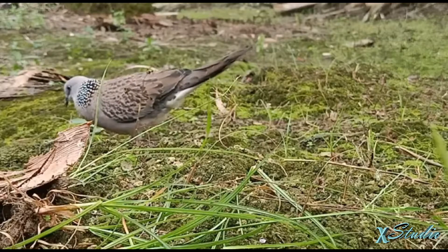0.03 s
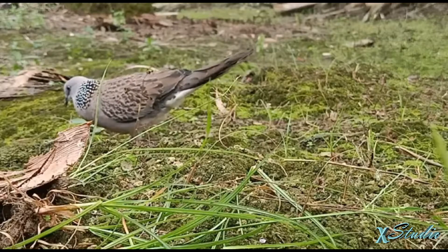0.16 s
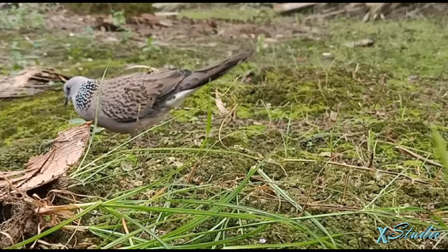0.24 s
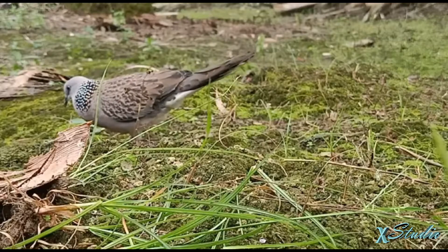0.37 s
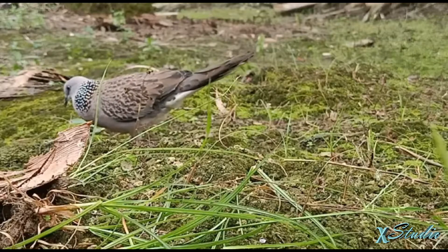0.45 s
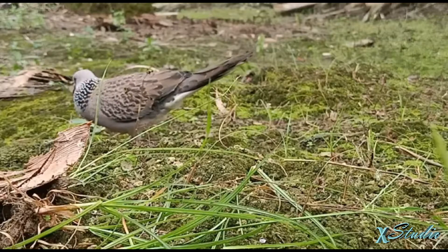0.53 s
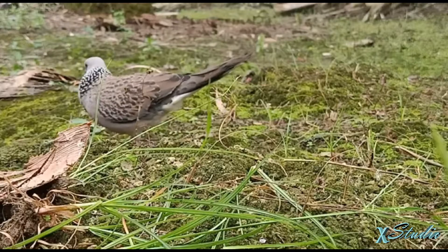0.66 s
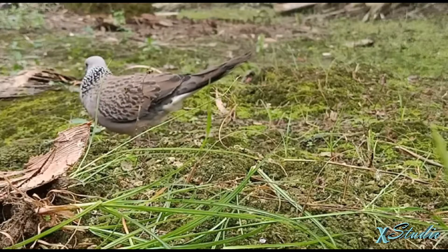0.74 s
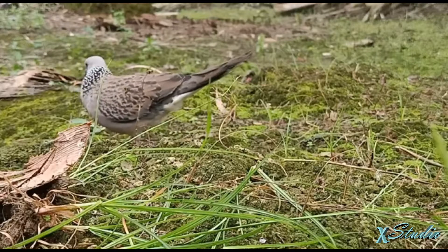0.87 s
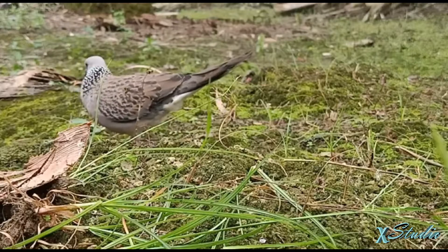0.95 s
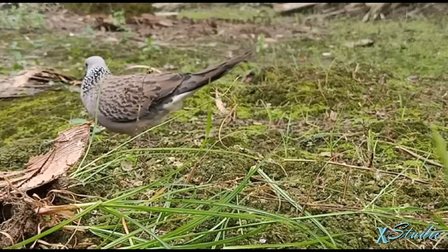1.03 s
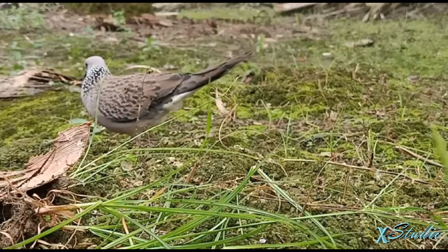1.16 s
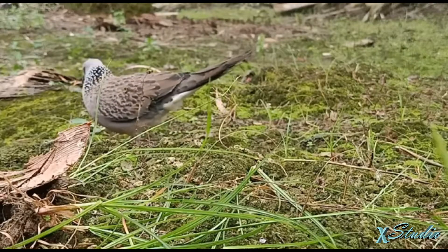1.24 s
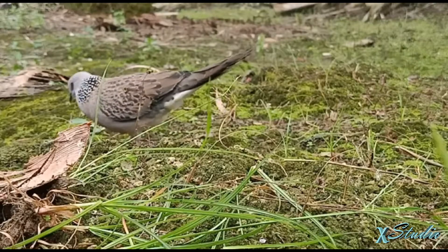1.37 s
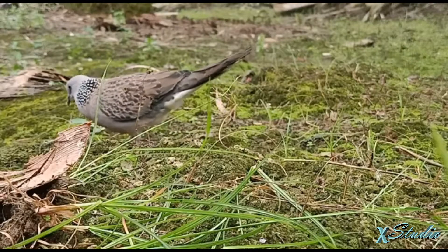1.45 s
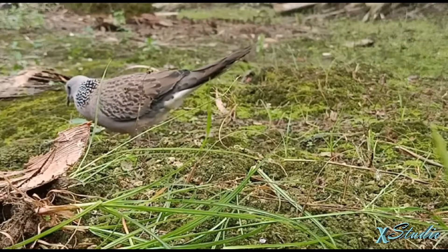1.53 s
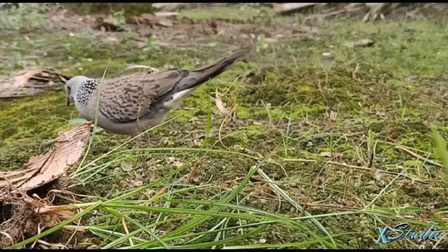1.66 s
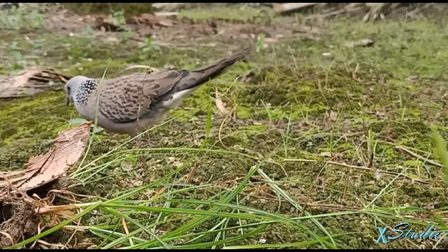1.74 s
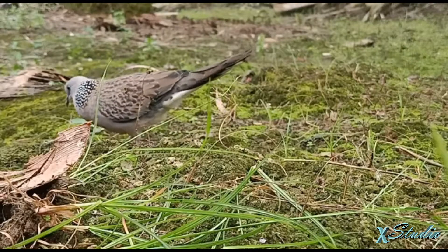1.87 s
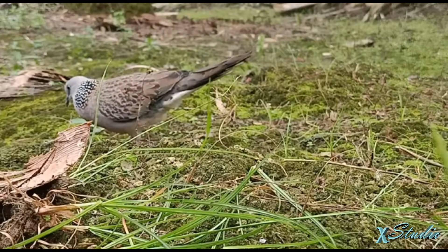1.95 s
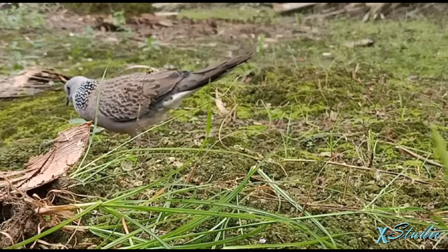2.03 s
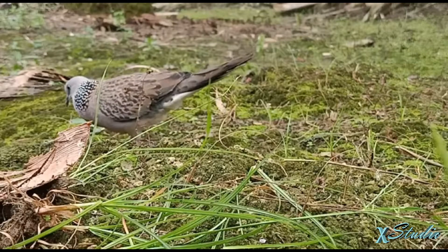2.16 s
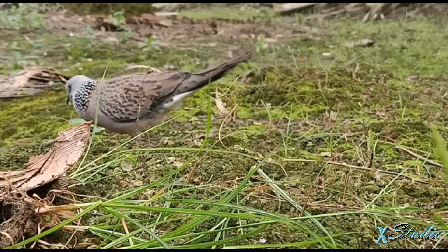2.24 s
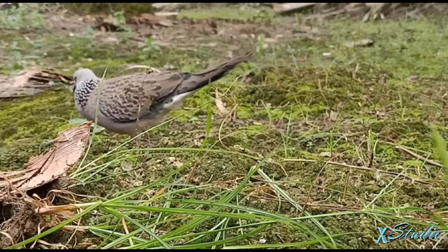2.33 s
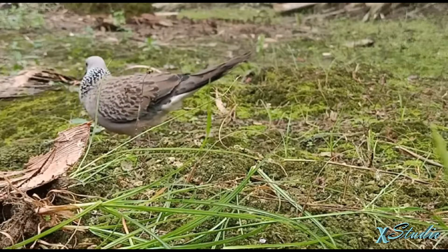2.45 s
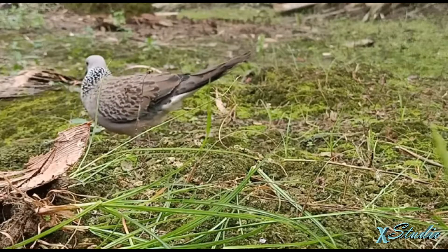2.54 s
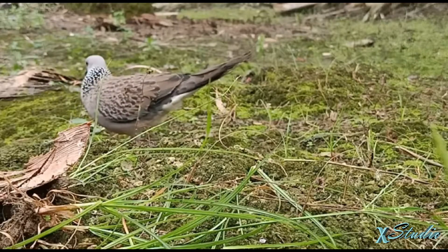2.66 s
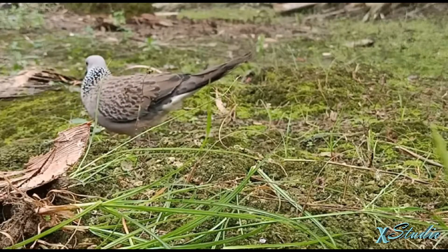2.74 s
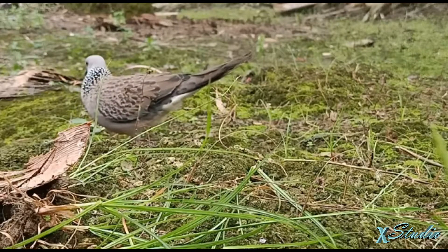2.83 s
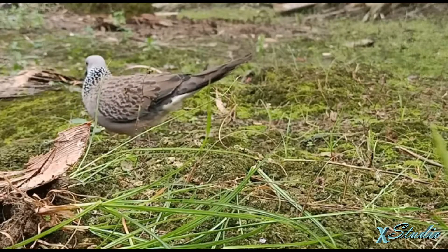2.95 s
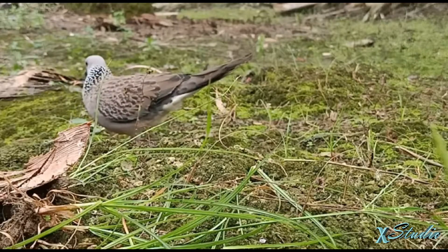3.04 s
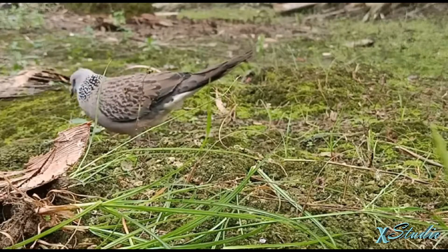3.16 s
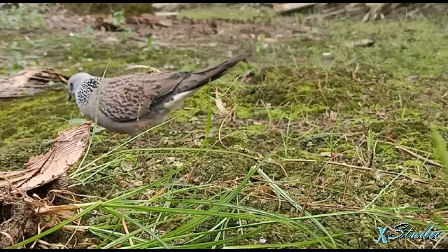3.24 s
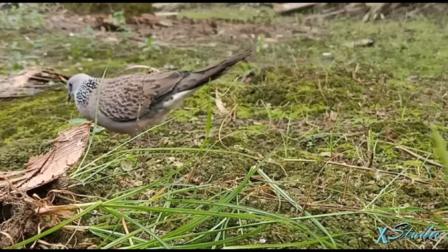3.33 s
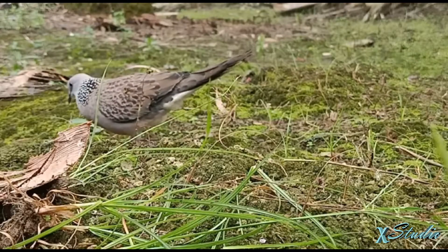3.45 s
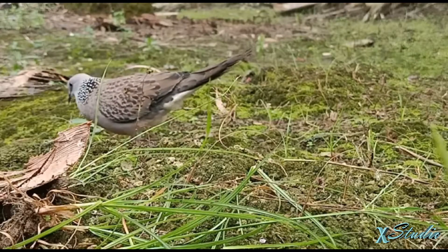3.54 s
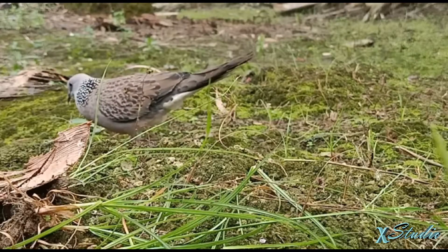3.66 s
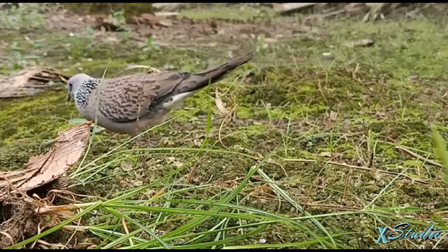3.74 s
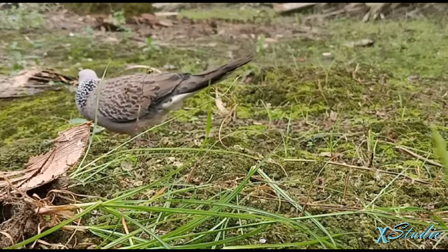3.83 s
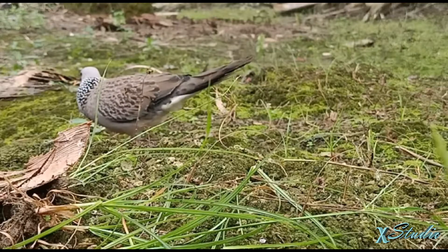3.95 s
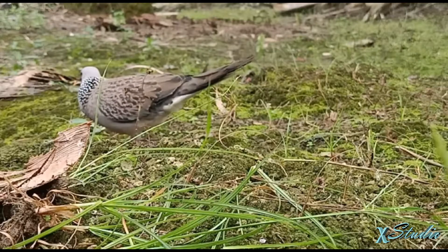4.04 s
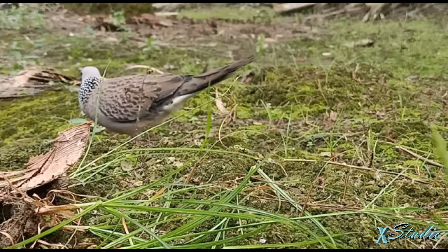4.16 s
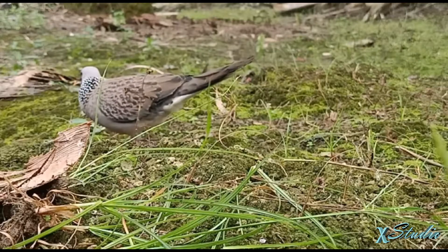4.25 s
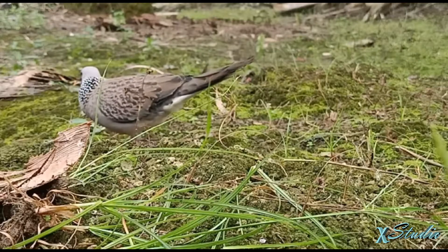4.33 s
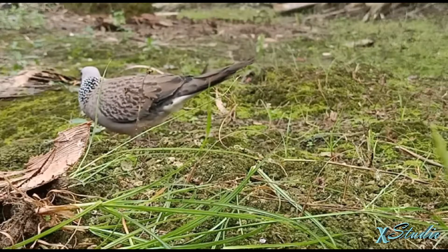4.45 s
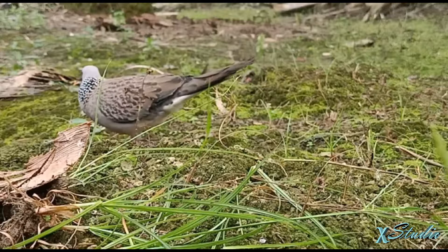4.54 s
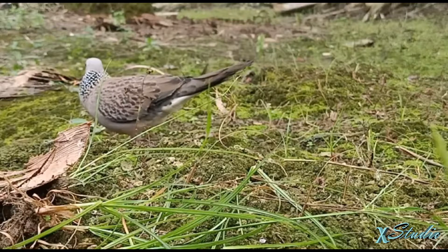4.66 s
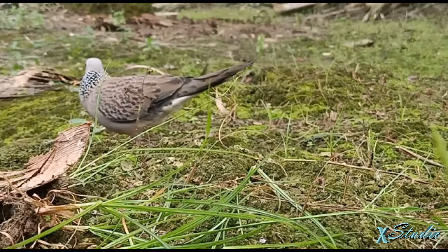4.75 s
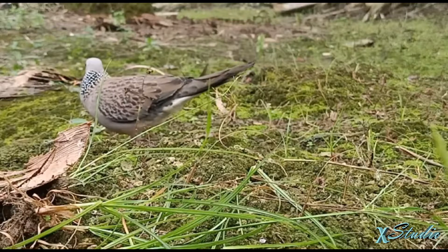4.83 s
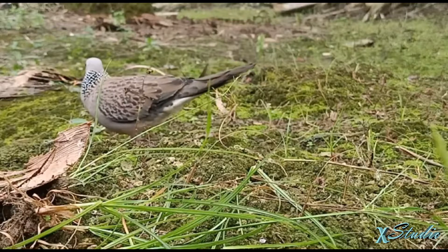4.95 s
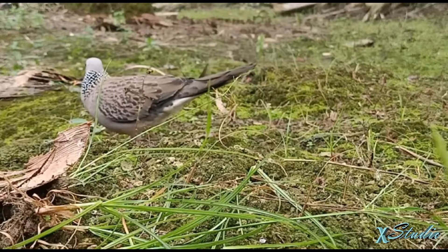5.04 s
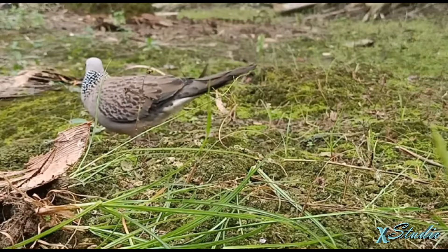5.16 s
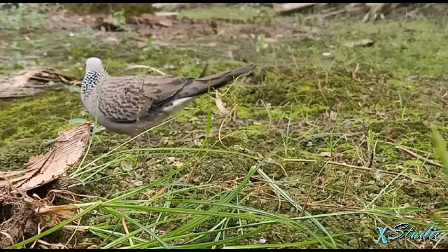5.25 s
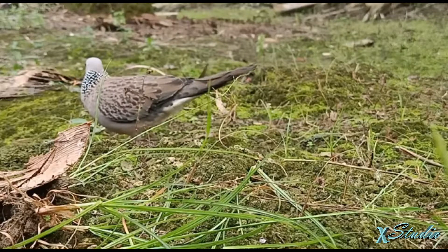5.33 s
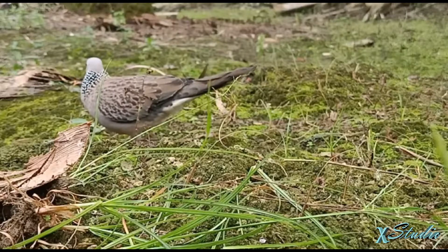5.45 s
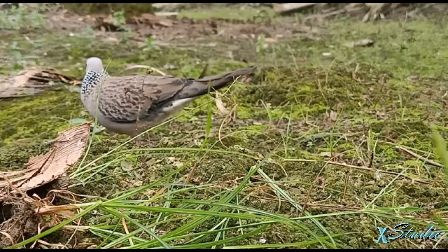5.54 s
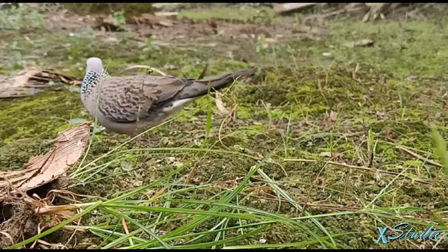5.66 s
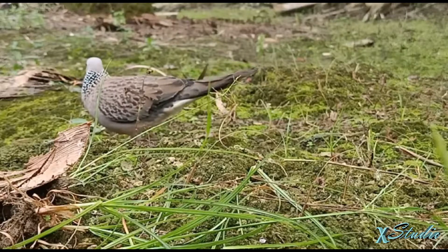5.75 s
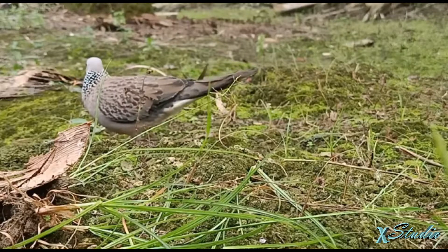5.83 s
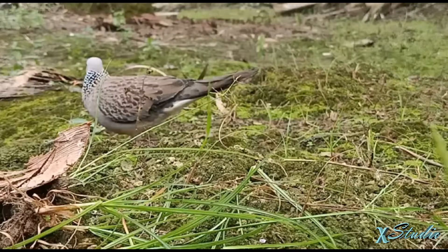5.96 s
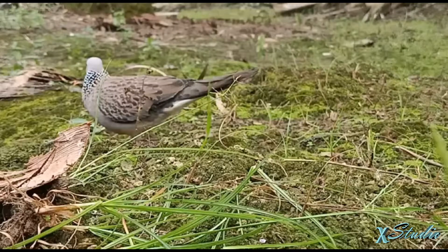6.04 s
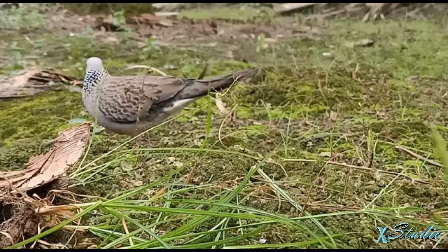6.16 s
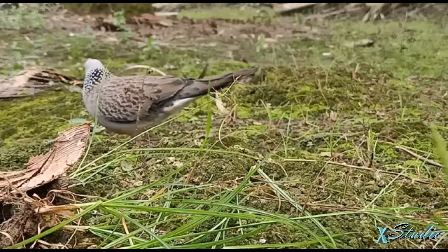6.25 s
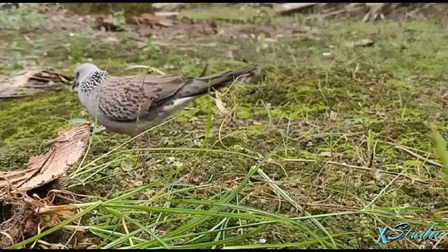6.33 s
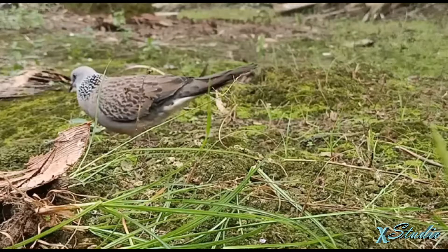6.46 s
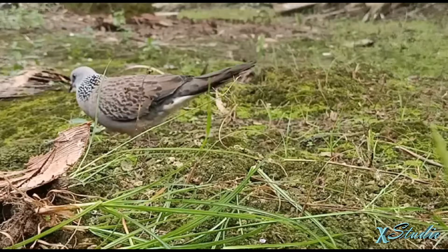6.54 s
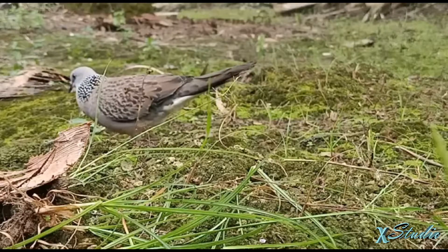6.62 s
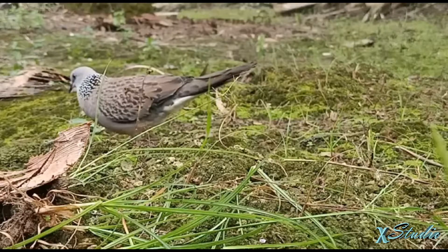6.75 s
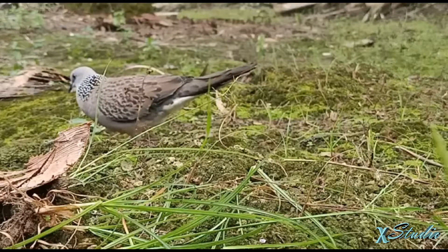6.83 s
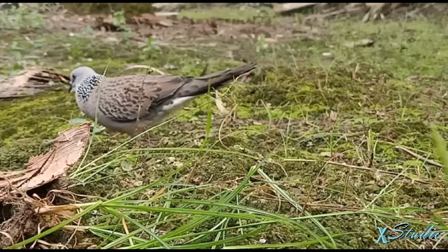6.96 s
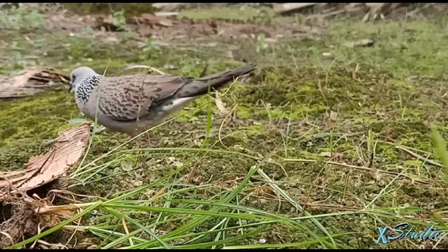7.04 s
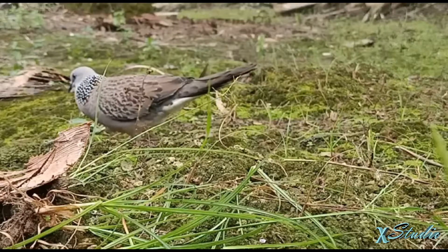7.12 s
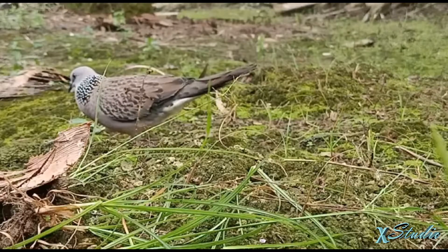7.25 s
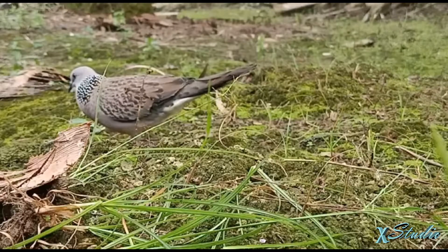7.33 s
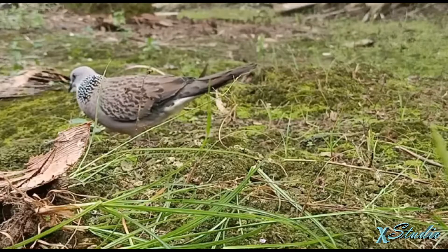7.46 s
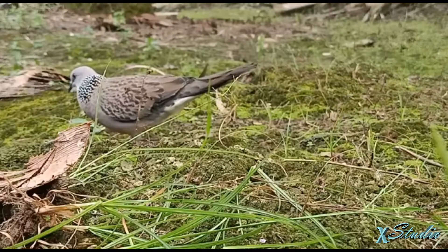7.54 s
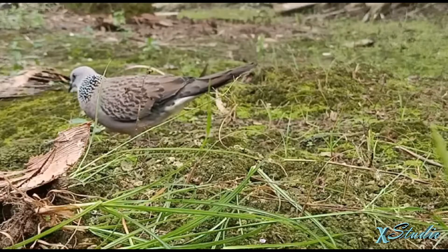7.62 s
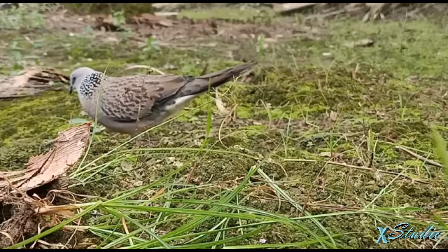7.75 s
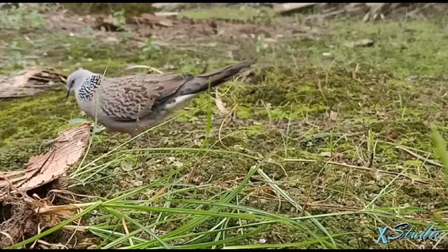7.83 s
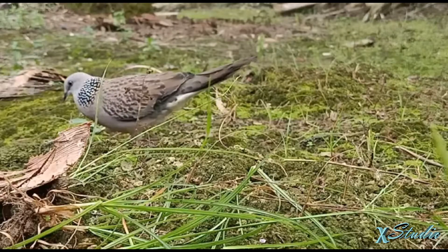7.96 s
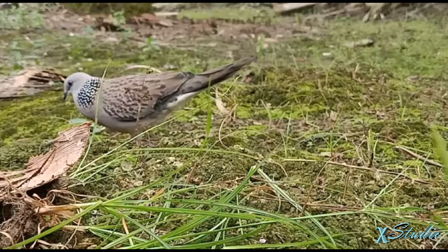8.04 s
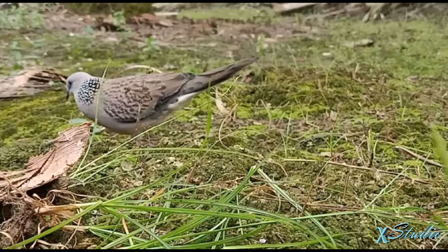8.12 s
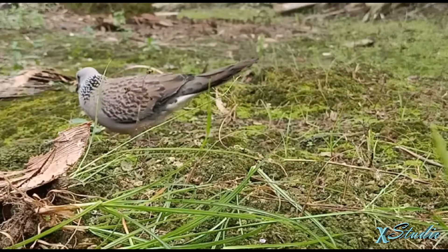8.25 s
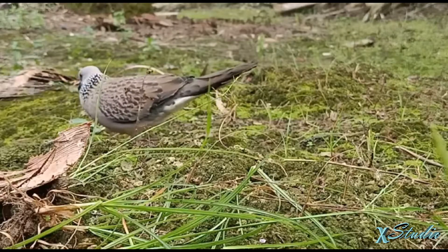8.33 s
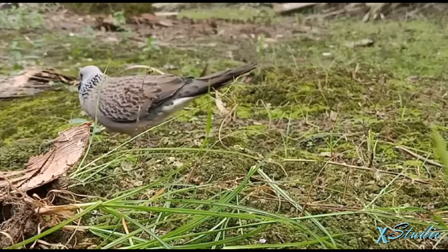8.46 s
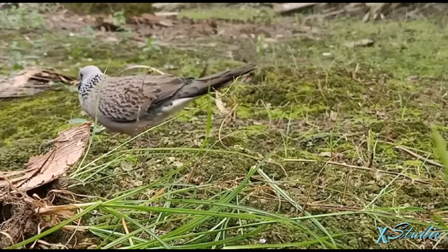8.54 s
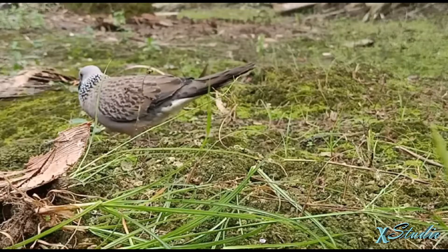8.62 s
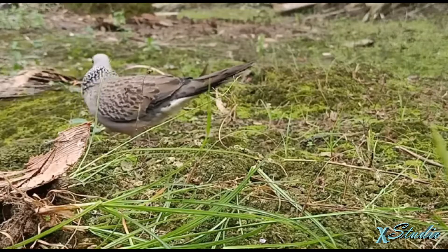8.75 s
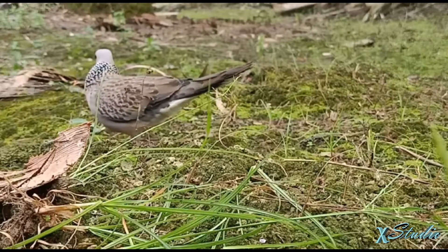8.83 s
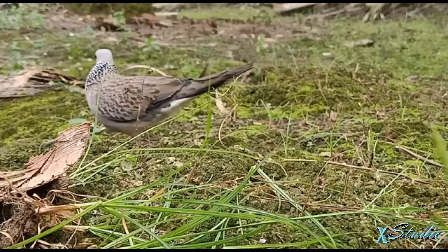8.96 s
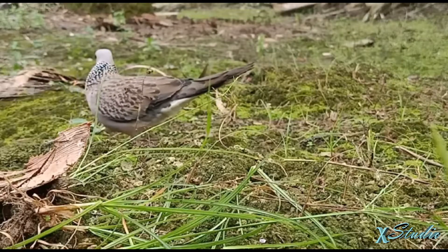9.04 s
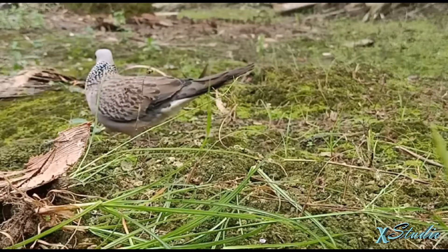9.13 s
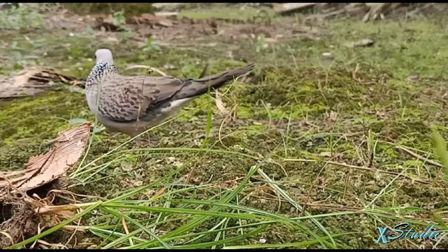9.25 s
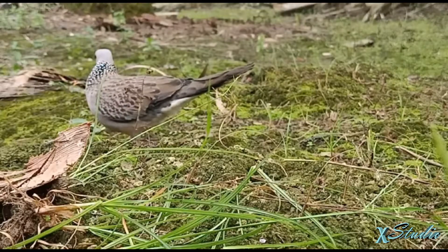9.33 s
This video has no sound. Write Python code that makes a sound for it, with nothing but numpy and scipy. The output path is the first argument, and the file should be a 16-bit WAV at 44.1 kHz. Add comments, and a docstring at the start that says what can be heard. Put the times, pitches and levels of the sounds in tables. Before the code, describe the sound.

Dry, loud and nearly pure dove calls dominate a quiet open-air garden with trees. The first phrase is already under way with a clipped hoot and a throaty trilled coo; four complete phrases follow, with a longer rest before the fourth. High, brief cricket chirps pulse regularly over a constant fine insect shimmer, faint air and hiss. Far raspy bird chatter echoes in the first seconds, then only sparse faint whistles. Close stereo microphone, dove almost central.

```python
"""Dove on the garden floor

A dove close to a stereo camera gives short hoots, throbbing murmurs and long throbbing coos: near-sine tones
with a ragged octave and, in the throbs, breath noise. Two crickets chirp in falling wing strokes.
Behind them shaped noise makes a steady insect chorus, leaves, far traffic and thin hiss.
Far birds, sines along pitch tables, chatter raspily and whistle among trees that echo."""
import sys
import numpy as np
from scipy import signal
from scipy.fft import rfft, irfft, next_fast_len
from scipy.io import wavfile
from scipy.ndimage import uniform_filter1d

SR = 44100
rng = np.random.default_rng(int(sys.argv[2]) if len(sys.argv) > 2 else 0)


def wav_out(sig):
    """Save sig, one row per channel (or a flat mono array), as 16-bit PCM at SR to the path in sys.argv[1]."""
    wavfile.write(sys.argv[1], SR, np.round(np.clip(np.atleast_2d(sig).T, -1, 1) * 32767).astype(np.int16))


N = 414099  # samples


def amp(db):
    """Amplitude of a level in dB."""
    return 10 ** (np.asarray(db) / 20)


def unit(x):
    """Scales x to an rms of 1."""
    return x / np.sqrt(np.mean(x ** 2) + 1e-20)


def sine(hz):
    """A sine that follows one pitch per sample."""
    return np.sin(2 * np.pi * np.cumsum(hz) / SR)


def along(points, hz):
    """Reads (Hz, value) points on a log frequency axis."""
    f, v = np.transpose(points)
    return np.interp(np.log(hz + 1), np.log(f + 1), v)


def note(rows):
    """First sample of a note and one value per sample for each column after the time."""
    s, *columns = np.transpose(rows)
    first = max(round(s[0] * SR), 0)
    t = np.arange(first, round(s[-1] * SR)) / SR
    return first, [np.interp(t, s, column) for column in columns]


def add(track, first, x):
    """Mixes x into the track from sample first, cutting what falls outside."""
    x = x[max(-first, 0):len(track) - first]
    track[max(first, 0):][:len(x)] += x


def filtered(x, response):
    """Multiplies the spectrum of x by a response of frequency."""
    m = next_fast_len(N + SR // 2)
    return irfft(rfft(x, m) * response(np.fft.rfftfreq(m, 1 / SR)), m)[..., :N]


# How alike the two microphones hear the ambience. Each row: frequency in Hz, left-right likeness from 0 to 1.
LIKENESS = [(60, .9), (130, 0.68), (290, 0.8), (640, 0.45), (15000, .01)]


def rush(spectrum, patchy_db):
    """Diffuse stereo noise of rms 1: shared and opposed parts set its width, patches of random gain its unrest."""
    z = signal.stft(rng.standard_normal((2, N)), nperseg=512)[2]
    patches = uniform_filter1d(rng.standard_normal(z.shape[1:]), size=6, axis=0)
    patches = unit(uniform_filter1d(patches, size=14, axis=1))
    pair = signal.istft(z * amp(patchy_db * patches), nperseg=512)[1][:, :N]

    def mid_side(hz):
        turn = np.arccos(np.clip(along(LIKENESS, hz), -1, 1)) / 2
        return amp(along(spectrum, hz)) * [np.cos(turn), np.sin(turn)]

    mid, side = filtered(pair, mid_side)
    return unit(np.array([mid + side, mid - side]))


# Echo of the trees. Each row: frequency in Hz, time to die by 60 dB in seconds.
TREE_DECAY = [(400, 0.82), (1000, 0.69), (3000, 0.39), (9000, 0.13)]


def echo(x, gap):
    """Scattered echo after a gap in seconds: noise that dies at its own speed per frequency, unlike in each ear."""
    hz, t, z = signal.stft(rng.standard_normal((2, SR // 2)), SR, nperseg=256)
    tail = signal.istft(z * amp(-60 * t / along(TREE_DECAY, hz)[:, None]), SR, nperseg=256)[1]
    late = np.pad(x, (max(round(gap * SR), 0), 0))[None]
    return signal.fftconvolve(late, tail / np.linalg.norm(tail[0]), axes=1)[:, :N]


# Spectra of the insect chorus, of leaves with far traffic, and of a thin treble hiss.
# Each row: frequency in Hz, relative level in dB per Hz.
CHORUS_SPECTRUM = [(3470, -62.5), (5900, -36.5), (6410, -18), (6620, -11.5), (6820, -2), (7140, 3),
                   (7530, -2), (8100, -18.5), (8740, -18.5), (9800, -35), (12700, -69.5), (21600, -120)]
AIR_SPECTRUM = [(15, -39), (25, -7), (47, -17.5), (70, -3.5), (167, -6.5), (252, -8.5), (477, -10),
                (560, -11.5), (845, -9), (1400, -16), (2420, -9.5), (3110, -15.5), (5900, -20),
                (7670, -50.5), (13000, -120)]
HISS_SPECTRUM = [(5710, -37), (9700, -10.5), (11800, 2), (12300, -27), (12600, -37.5), (12900, -7.5),
                 (13300, -4), (14900, 3), (15600, -6.5)]
# Course of the chorus, before the offset of each ear. Each row: time in seconds, level in dB.
CHORUS_COURSE = [(0.0, -54), (0.15, -55), (7.43, -55), (9.28, -54.5), (9.34, -57), (9.39, -53)]
# Beats in the chorus. Each row: beats a second, depth as a share.
CHORUS_BEATS = [(19.8, .2), (79, 0.2), (99, 0.28)]


def background():
    """The insect chorus beats at several rates over leaves, traffic and hiss."""
    t = np.arange(N) / SR
    chorus = rush(CHORUS_SPECTRUM, patchy_db=0)
    for rate, depth in CHORUS_BEATS:
        chorus *= 1 + depth * np.sin(2 * np.pi * rate * t + rng.uniform(0, 6, (2, 1)))
    ear_db = np.array([[4.5], [1.5]])  # left, right
    chorus = amp(np.interp(t, *np.transpose(CHORUS_COURSE)) + ear_db) * unit(chorus)
    air = amp(-64) * rush(AIR_SPECTRUM, patchy_db=2)
    hiss = amp(-70.5) * rush(HISS_SPECTRUM, patchy_db=0.5)
    return chorus + air + hiss


def whistle(track, rows, rasp=0):
    """A sine along a pitch and level table; rasp roughens its level with smoothed noise."""
    first, (hz, db) = note(rows)
    edge = signal.windows.tukey(len(hz), .2)
    grain = 1 + rasp * unit(uniform_filter1d(rng.standard_normal(len(hz)), size=220))
    add(track, first, np.sqrt(2) * amp(db) * edge * grain * sine(hz))


# One chattered syllable, upper voice then lower voice.
# Each row: seconds after the onset, pitch in Hz before its factor, relative level in dB.
CHATTER_SYLLABLE = [
    [(-.012, 2597, -7.5), (-.005, 2950, 5), (.002, 3400, -6), (.01, 3280, -19.5)],
    [(-.002, 1872, -9.5), (.008, 2192, 6), (.018, 2650, 5), (.034, 2662, -7), (.05, 2284, -8)],
]
# The far bird's chatter. Each row: onset in seconds, upper and lower voice level in dB before the mix,
# upper and lower pitch factor.
CHATTER_ONSETS = [(0.447, -52.5, -57.5, 1.1, .93), (0.662, -52.5, -54.5, 1, 1.03),
                  (0.801, -52.5, -55, 1, 1.02), (0.941, -55, -52.5, 1.02, 1.07),
                  (1.082, -56.5, -53, 1.02, 1.07), (1.228, -53.5, -54, 1.02, 1.07),
                  (1.369, -55.5, -51, 1.02, 1.06), (1.514, -53.5, -55, 1, 1.01),
                  (1.68, -56.5, -56.5, .99, .99), (2.458, -60, -62.5, 1.05, .88),
                  (2.702, -58.5, -59.5, 1.07, .92), (4.569, -64.5, -80.5, 1.1, .98),
                  (4.634, -64.5, -89, 1, 1.1), (4.89, -73, -70.5, 1.1, 1.1)]
# Clear whistles from far off, one table each. Each row: time in seconds, pitch in Hz, level in dB before the mix.
CLEAR_WHISTLES = [
    [(.472, 3830, -66), (.485, 3720, -64), (.5, 3600, -58.5), (.52, 3300, -74)],
    [(.11, 2250, -75), (.135, 2624, -52.5), (.15, 2610, -61), (.165, 2810, -51.5), (.2, 3000, -64),
     (.23, 2860, -75)],
    [(2.51, 2384, -77), (2.56, 2760, -70.5), (2.61, 3105, -70.5), (2.64, 3180, -73), (2.66, 3180, -75)],
    [(3.25, 2880, -63), (3.28, 3080, -77.5), (3.33, 3420, -82), (3.37, 3460, -76)],
    [(3.49, 2795, -68), (3.52, 2780, -71), (3.58, 2750, -86.5), (3.61, 2720, -79)],
    [(3.62, 2960, -69), (3.64, 3020, -68), (3.68, 3200, -83), (3.72, 3130, -74)],
    [(4.73, 2600, -71), (4.76, 2770, -70), (4.79, 2990, -72)],
    [(5.03, 5000, -80), (5.05, 5200, -76.5), (5.08, 5660, -83)],
    [(6.3, 2516, -67), (6.34, 2390, -83), (6.4, 2460, -81.5)],
    [(5.48, 5140, -79), (5.52, 5280, -79), (5.55, 5450, -80)],
    [(7.33, 4866, -74), (7.37, 5260, -78), (7.4, 5740, -73)],
    [(7.65, 1020, -64), (7.665, 1000, -61.5), (7.68, 1210, -79), (7.7, 1290, -78), (7.73, 1187, -73),
     (7.75, 1247, -69.5), (7.775, 1210, -73.5), (7.8, 1250, -75.5), (7.82, 1080, -72)],
    [(7.855, 950, -62), (7.865, 1085, -73.5), (7.878, 1255, -73), (7.895, 1050, -75.5)],
    [(7.89, 5140, -71), (7.93, 5300, -78), (7.97, 5640, -88)],
]


def birds():
    """One far bird repeats a raspy two-voiced syllable; others whistle clear sines."""
    chatter, clear = np.zeros(N), np.zeros(N)
    for s, upper_db, lower_db, *factors in CHATTER_ONSETS:
        for rows, db, factor in zip(CHATTER_SYLLABLE, (upper_db, lower_db), factors):
            whistle(chatter, np.array(rows) * [1, factor, 1] + [s, 0, db], rasp=.45)
    for rows in CLEAR_WHISTLES:
        whistle(clear, rows)
    return chatter, clear


# Chirps of the nearer and of the fainter cricket.
# Each row: end in seconds, length in seconds, peak level in dB before stroke scatter and the mix.
NEAR_CHIRPS = [(0.4607, 0.1, -38), (0.8689, 0.099, -36), (1.303, 0.1, -36), (1.7338, 0.1, -36),
               (2.1851, 0.11, -36), (2.6392, 0.093, -38), (3.0863, 0.094, -38.5), (3.5274, 0.1, -38.5),
               (4.0081, 0.099, -37.5), (4.4437, 0.096, -38.5), (4.876, 0.1, -38), (5.3193, 0.11, -38),
               (5.7743, 0.11, -37.5), (6.234, 0.11, -37.5), (8.4436, 0.092, -37.5), (8.8407, 0.089, -37.5),
               (9.2469, 0.093, -35.5)]
FAR_CHIRPS = [(end, .06, -60) for end in (.44, .87, 1.3, 1.72, 2.15, 2.56, 2.99, 3.55, 4.16, 4.619, 5.09, 5.62, 6.13, 6.66, 7.14, 7.62, 8.089, 8.54, 9.05)]


def cricket(chirps, hz, fall_hz, rate, swell_db, narrow):
    """Each wing stroke (rate a second) is a short falling tone; the strokes of a chirp swell at its start."""
    out = np.zeros(N)
    for end, length, db in chirps:
        left = np.arange(round(length * rate + .5) * SR / rate)[::-1] / SR  # seconds until the chirp ends
        stroke_number = (left * rate).astype(int)
        cycle = -left * rate % 1
        size = amp(rng.normal(0, 1.2, 40))[stroke_number]
        swell = amp(-swell_db * np.clip(1 - (left[0] - left) / .03, 0, 1))
        phase = 2 * np.pi * np.cumsum(hz - fall_hz * (cycle - .5)) / SR
        phase += rng.normal(0, 1.5, 40)[stroke_number]  # strokes are not in step
        stroke = np.sin(np.pi * cycle) ** narrow * np.sin(phase)
        add(out, round((end + .5 / rate - left[0]) * SR), amp(db) * size * swell * stroke)
    return out


def voice(track, first, hz, size, octave):
    """The tone goes to one track; its ragged octave, which grows more slowly with effort, to another."""
    phase = 2 * np.pi * np.cumsum(hz) / SR + rng.uniform(0, 2 * np.pi)
    add(track, first, size * np.sin(phase))
    ragged = 1 + .45 * unit(uniform_filter1d(rng.standard_normal(len(hz)), size=150))
    add(octave, first, ragged * size ** .55 * np.sin(2 * phase))


# Shapes of the dove's two smooth hoots.
# Each row: share of the length, Hz relative to the top pitch, dB relative to the top level.
OPENING_SHAPE = [(0, -230, -44), (.14, -110, -9), (.29, -35, -7), (.42, 2.5, 0.5), (.64, -15, -1.5),
                 (.77, -85, -7), (.88, -150, -11.5), (1, -170, -22.5)]
CLOSING_SHAPE = [(0, -86.5, -16), (.14, -16.5, -0.5), (.3, 2.5, -1.5), (.55, -19, -1), (.7, -100, -3),
                 (.85, -190, -17.5), (1, -200, -26.5)]
# Opening and closing hoots. Each row: start in seconds, length in seconds, top pitch in Hz, top level in dB.
OPENING_HOOTS = [(1.438, 0.074, 678, -16.5), (3.243, 0.074, 686, -16.5), (6.438, 0.073, 699.6, -17),
                 (7.932, 0.075, 728, -15.5)]
CLOSING_HOOTS = [(.006, 0.066, 751, -15), (1.687, 0.059, 739, -15), (3.495, 0.069, 753.4, -14.5),
                 (6.699, .08, 760.4, -14.5), (8.156, 0.07, 731.6, -15)]


def hoots():
    """Every hoot stretches its shape: rows of time in seconds, pitch in Hz, level in dB."""
    return [np.array(shape) * [length, 1, 1] + [s, hz, db]
            for shape, calls in ((OPENING_SHAPE, OPENING_HOOTS), (CLOSING_SHAPE, CLOSING_HOOTS))
            for s, length, hz, db in calls]


# Throbbing murmurs that swell into a closing hoot. Each row: start and end in seconds,
# first, quietest and last level in dB, swell in dB per second.
MURMUR_CALLS = [(-.02, 0.007, -36, -28, -15.5, 284), (1.496, 1.689, -35, -42, -12.5, 290.5),
                (3.325, 3.498, -38.5, -43, -13, 277), (6.502, 6.701, -39, -56, -11.5, 329.5),
                (8.006, 8.156, -39, -43.5, -16, 279.5)]
MURMUR_FADE_DB_PER_S, MURMUR_DIP_DB = 300.5, 25
EARLY_GAP_S, LAST_GAP_S, QUICKEN_S = .015, .012, .07  # throbs come faster towards the hoot
JOIN_DB = -34  # dip between the last throb and the hoot


def murmur(start, end, first_db, quiet_db, last_db, swell):
    """Throb starts, peaks and dips of a murmur, counted back from the hoot that it leads to."""
    s = [end]
    while s[0] - EARLY_GAP_S / 2 > start:
        gap = EARLY_GAP_S - (EARLY_GAP_S - LAST_GAP_S) * np.exp((s[0] - end) / QUICKEN_S)
        s.insert(0, s[0] - gap)
    s = np.array(s)
    fading = np.maximum(first_db - MURMUR_FADE_DB_PER_S * (s - start), quiet_db)
    peak_db = np.maximum(fading, last_db - swell * (end - s))
    dip_db = np.append(peak_db[:-1] - MURMUR_DIP_DB, JOIN_DB)
    return s, peak_db, dip_db, -90  # practically no second tone


# Long coos, one table each. Each row: time in seconds, throbs a second, peak level in dB before scatter.
COO_COURSES = [
    [(0.203, 40.3, -24.2), (0.226, 41.1, -16.0), (0.283, 54.2, -15.8), (0.381, 69.1, -15.1),
     (0.479, 63.1, -16.1), (0.577, 50.9, -19.5), (0.675, 40.7, -26.2), (0.712, 48.9, -35.3),
     (0.735, 48.9, -35.3)],
    [(1.878, 40.9, -25.5), (1.899, 44.4, -15.7), (1.958, 66.4, -15.8), (2.06, 62.4, -15.8),
     (2.161, 64.1, -16.0), (2.263, 51.8, -18.0), (2.365, 47.2, -27.1), (2.405, 49.4, -40.0),
     (2.425, 49.4, -40.0)],
    [(3.697, 35.5, -22.5), (3.722, 42.0, -15.9), (3.777, 52.8, -15.2), (3.844, 59.9, -15.6),
     (3.912, 65.3, -14.7), (3.979, 63.7, -14.7), (4.046, 44.1, -19.1), (4.082, 38.7, -28.9),
     (4.106, 38.7, -28.9)],
    [(6.916, 34.0, -20.7), (6.944, 37.1, -15.0), (6.996, 44.0, -14.7), (7.081, 58.3, -14.6),
     (7.166, 70.3, -15.9), (7.25, 59.5, -19.0), (7.335, 46.7, -24.9), (7.372, 56.6, -37.6),
     (7.395, 56.6, -37.6)],
    [(8.358, 43.4, -30.8), (8.378, 53.1, -16.5), (8.438, 66.6, -16.0), (8.525, 59.4, -15.0),
     (8.612, 67.1, -16.4), (8.698, 50.7, -21.6), (8.785, 34.8, -29.4), (8.829, 47.8, -38.2),
     (8.845, 47.8, -38.2)],
]
# A second tone late in each long coo. One column, a value per coo: level in dB relative to the first tone.
COO_SECOND_DB = [-7, -9, -18.5, -14, -8]
JITTER_S, SIZE_SCATTER_DB = .0016, 1  # standard deviations per throb
DIP_DB, FULL_DB, DIP_SCATTER_DB = 26, -15.5, 6  # dip depth at full voice, that voice's peak, scatter of depth
FUSE = 3  # dB of dip depth lost per dB that the coo fades
SHUT_DB = -55  # level at both ends of a coo


def coo(rows, second_db):
    """Throb starts, peaks and dips of a long coo: a throb begins when the summed rate passes a whole number."""
    first, (rate, db) = note(rows)
    t = (first + np.arange(len(rate))) / SR
    done = np.cumsum(rate) / SR
    s = np.interp(np.arange(round(done[-1])), done, t)
    late, deeper, louder = rng.standard_normal((3, len(s)))
    s = np.append(s + JITTER_S * late * (s > t[0]), t[-1])
    peak_db = np.interp(s, t, db) + SIZE_SCATTER_DB * np.append(louder, 0)
    depth = DIP_DB - FUSE * (FULL_DB - peak_db) + DIP_SCATTER_DB * np.append(deeper, 0)
    dip_db = peak_db - np.maximum(depth, 3)
    dip_db[[0, -1]] = SHUT_DB
    return s, peak_db, dip_db, second_db


# Louder throbs sound higher. Each row: peak level in dB, pitch in Hz before scatter, sag and swing.
EFFORT_PITCH = [(-45.5, 480), (-39, 530), (-28, 575), (-19, 655), (-14, 713)]
FULL_PEAK = .16  # amplitude of full effort
SWEEP_HZ = 45  # pitch swing either way in a throb at full effort and depth
FRESH_HZ, EVEN_S = 45, .25  # a full-voiced coo starts this much sharp and has sagged to its pitch by then
DROOP_HZ, DROOP_S = 95, .034  # last fall of a long coo
SECOND_HZ, SECOND_SAG_HZ_PER_S = 773, 150  # second tone, pitch reckoned from the start of the coo
SECOND_FROM_S, SECOND_GROWS_S = .22, .1  # when it sets in, how long it grows
RASP = 2.5  # air noise in the throat, against the octave


def throbs(tone, octave, s, peak_db, dip_db, second_db):
    """In each throb the airway opens, the pitch climbs, and it shuts again; a second tone beats late in coos."""
    first = round(s[0] * SR)
    t = np.arange(first, round(s[-1] * SR)) / SR
    since = t - s[0]
    place = np.interp(t, s, np.arange(len(s)))
    k, cycle = place.astype(int), place % 1
    peak, dip = amp(peak_db[k]), np.interp(t, s, amp(dip_db))
    length = np.diff(s)[np.minimum(k, len(s) - 2)]

    # slow throbs leave longer gaps; late ones fuse
    sharp = np.clip(2.9 * length / .016, 1.4, 4.2) * np.clip(1.3 - since / .6, .45, 1)
    bump = np.sin(np.pi * cycle ** 1.12) ** sharp
    opening = np.tanh(1.5 * bump) / np.tanh(1.5)  # flat when wide open
    size = (dip + (peak - dip) * opening) * signal.windows.tukey(len(t), .02)

    pitches = np.interp(peak_db, *np.transpose(EFFORT_PITCH)) + rng.normal(0, 12, len(s))
    hz = np.interp(place - .5, np.arange(len(s)), pitches)  # glides from throb to throb
    long = s[-1] - s[0] > .3
    # the pitch sags as the air runs out
    hz += long * FRESH_HZ * (1 - since / EVEN_S) * np.clip(peak / FULL_PEAK, 0, 1)
    effort = np.clip(peak / FULL_PEAK, .25, 1)
    # the pitch climbs while the airway is open
    hz -= SWEEP_HZ * effort * np.clip(1 - dip / peak, 0, 1) * np.sin(2 * np.pi * cycle)
    hz -= DROOP_HZ * long * np.clip(1 - (s[-1] - t) / DROOP_S, 0, 1)
    hz = uniform_filter1d(hz, size=130)

    share = amp(second_db) * np.clip((since - SECOND_FROM_S) / SECOND_GROWS_S, 0, 1)
    size = size / np.sqrt(1 + share)
    voice(tone, first, hz, size, octave)
    add(tone, first, share * size * sine(SECOND_HZ - SECOND_SAG_HZ_PER_S * since))
    add(octave, first, RASP * size ** .55 * rng.standard_normal(len(t)))


def dove():
    """An almost pure tone from the closed beak, with a faint octave and breath through a throat resonance."""
    tone, octave = np.zeros(N), np.zeros(N)
    for rows in hoots():
        first, (hz, db) = note(rows)
        size = uniform_filter1d(amp(db), size=200) * signal.windows.tukey(len(hz), .1)
        voice(tone, first, hz, size, octave)
    for row in MURMUR_CALLS:
        throbs(tone, octave, *murmur(*row))
    for rows, second_db in zip(COO_COURSES, COO_SECOND_DB):
        throbs(tone, octave, *coo(rows, second_db))
    tone = filtered(tone, lambda hz: 1 / (1 + (330 / (hz + 1)) ** 8))  # takes out the bass
    throat = filtered(octave, lambda hz: 1 / (1 + ((hz - 1150) / 280) ** 2))
    return tone + amp(-43) * throat


def scene():
    """The dove is close and dry, slightly nearer the right microphone; the far birds come with strong echo."""
    chatter, clear = birds()
    far_birds = amp(-3.5) * chatter + amp(-1) * echo(chatter, gap=.0064)
    far_birds = far_birds + amp(1.5) * clear + amp(2) * echo(clear, gap=.011)

    near = cricket(NEAR_CHIRPS, hz=8226, fall_hz=710, rate=142.5, swell_db=12, narrow=2.8)
    far = cricket(FAR_CHIRPS, hz=9055, fall_hz=300, rate=149, swell_db=11, narrow=.83)
    crickets = near * amp([[-19], [0]]) + amp(-18.5) * echo(near, gap=.003)  # near one on the right
    crickets = crickets + far * amp([[0], [-6]])

    call = dove()
    close = np.array([np.roll(call, shift=5), call])  # reaches the left 5 samples later
    close = close + amp(-33.5) * echo(call, gap=.006)
    return close + crickets + far_birds + background()


def record(dry):
    """The camera adds a small steady offset and keeps nothing from its band limit of 15550 Hz up."""
    return filtered(dry, lambda hz: hz < 15550) + .001


dry = scene()
out = record(dry)
wav_out(out)
```